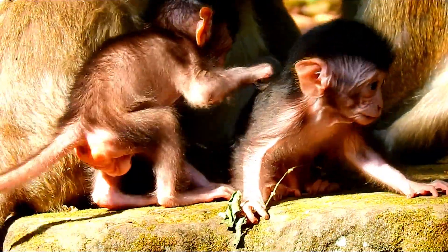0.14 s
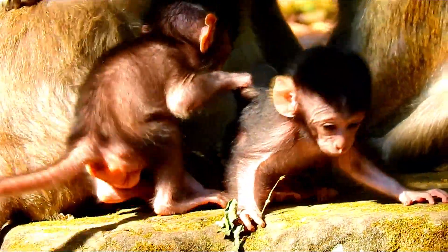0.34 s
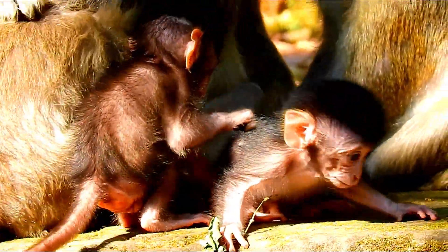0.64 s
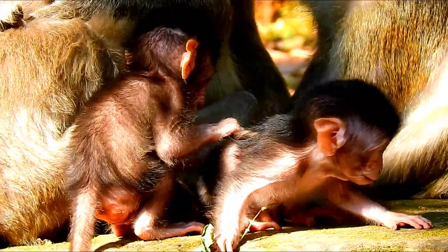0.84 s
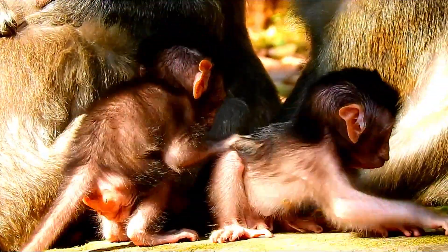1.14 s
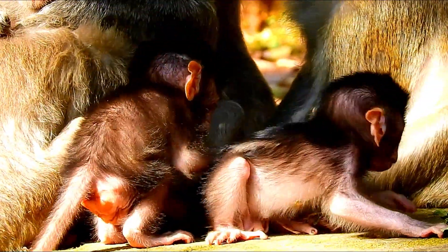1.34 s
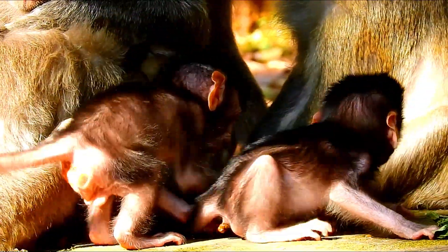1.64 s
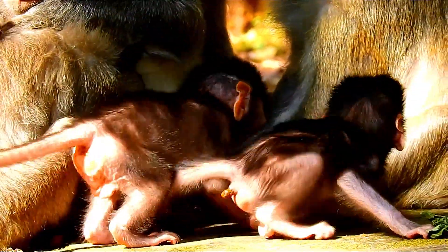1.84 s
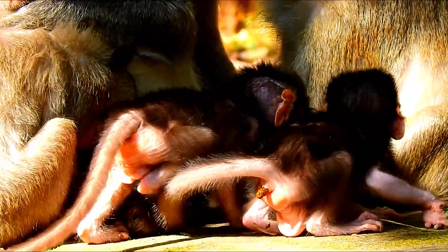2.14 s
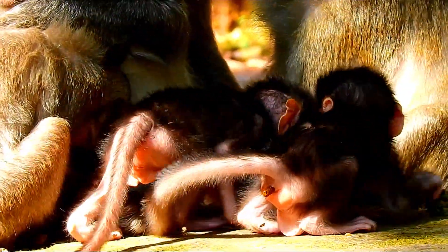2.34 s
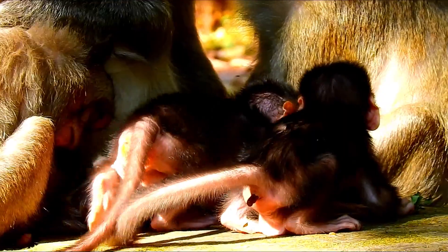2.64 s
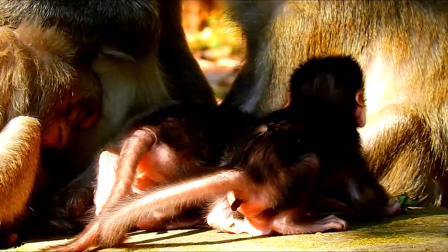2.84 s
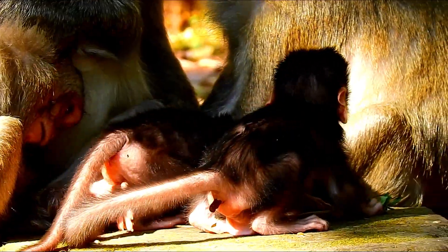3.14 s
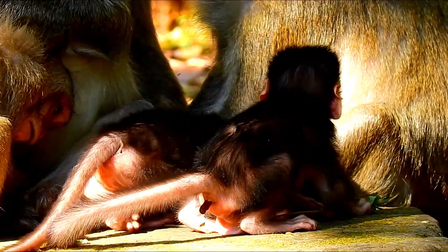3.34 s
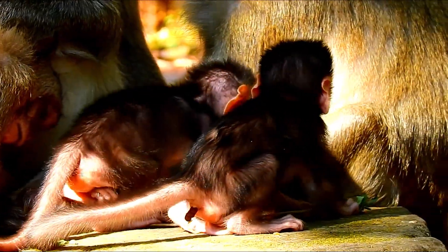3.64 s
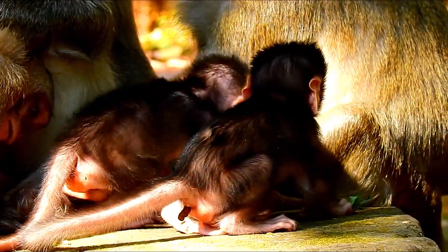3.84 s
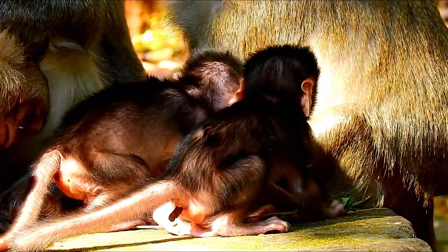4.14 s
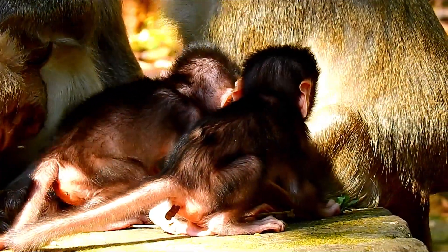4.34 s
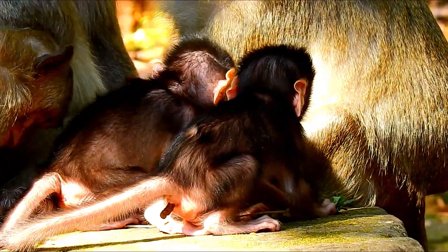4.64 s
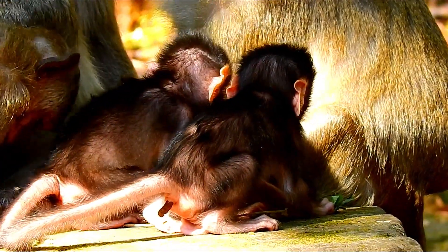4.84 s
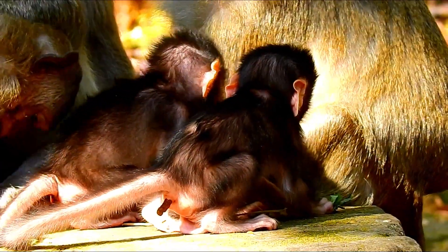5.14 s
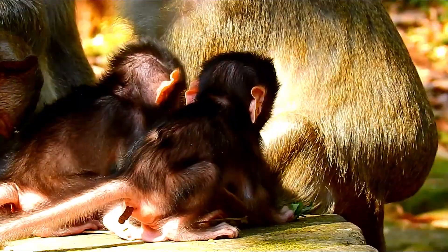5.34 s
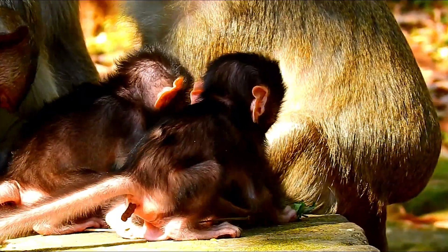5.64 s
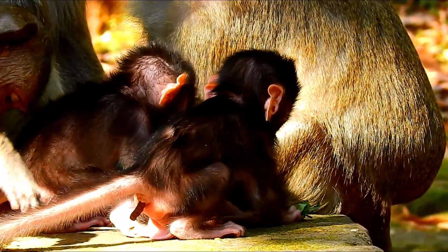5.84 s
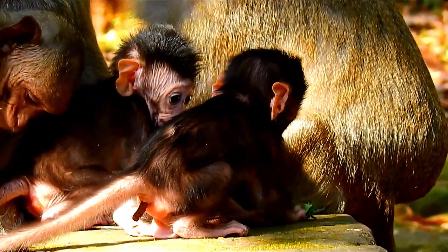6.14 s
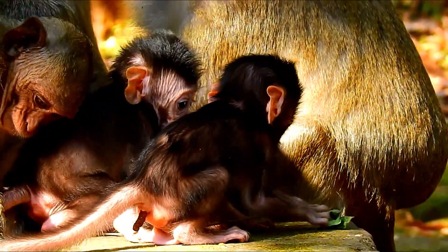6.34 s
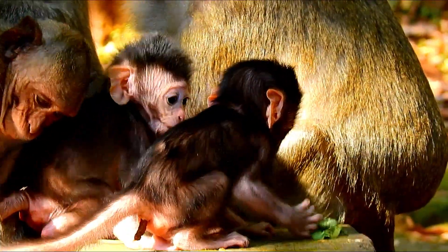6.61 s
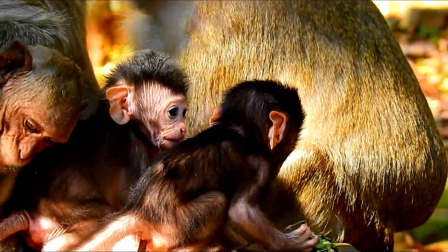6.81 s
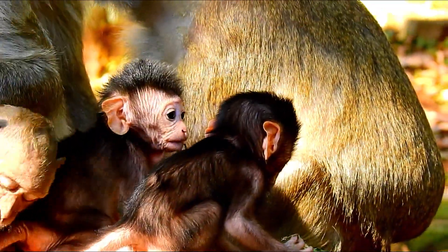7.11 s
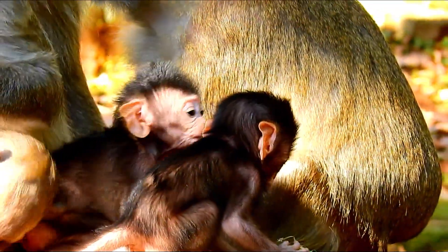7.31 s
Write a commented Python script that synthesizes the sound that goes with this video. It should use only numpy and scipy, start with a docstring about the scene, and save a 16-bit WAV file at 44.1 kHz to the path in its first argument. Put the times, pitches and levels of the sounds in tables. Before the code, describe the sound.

A baby monkey gives hoarse rasps, then a run of shrill, harsh, breaking squeals, followed by softer falling cries and a thin wail outdoors.

```python
"""Stone ledge outdoors, a monkey troop: faint low rumble, uneven rustle and crackling dry leaves behind.
The young ones clamber about with dull bumps and small ticks, made of short decaying noise bursts.
Slightly left and farther off, near-pure glides and swoops; slightly right, a baby monkey cries:
hoarse rasps of shaped noise, shrill period-doubled squeals that break into noise, then a thin wail.
The calls and ticks feed a diffuse echo of about half a second; a stereo microphone pair hears it all."""
import sys
import numpy as np
from scipy import signal
from scipy.fft import rfft, irfft, next_fast_len
from scipy.io import wavfile
from scipy.ndimage import uniform_filter1d, map_coordinates

SR = 44100
rng = np.random.default_rng(int(sys.argv[2]) if len(sys.argv) > 2 else 0)


def int16_out(signal):
    """Quantize to a 16-bit WAV file."""
    q = np.round(np.clip(np.atleast_2d(signal).T, -1, 1) * 32767)
    wavfile.write(sys.argv[1], SR, q.astype(np.int16))


N = 329547  # length in samples


def amp(db):
    """Decibels to gain."""
    return 10 ** (np.asarray(db) / 20)


def unit(x):
    """Scale to rms 1."""
    return x / np.sqrt(np.mean(x ** 2) + 1e-20)


def along(points, hz):
    """(f/Hz, value) points read on a log frequency axis."""
    f, v = np.transpose(points)
    return np.interp(np.log(hz + 1), np.log(f + 1), v)


def span(rows):
    """Sample times from the first row to the last."""
    first, last = round(rows[0][0] * SR), round(rows[-1][0] * SR)
    return np.arange(max(0, first), last) / SR


def curves(rows, t):
    """Each column of a table at the times t."""
    s, *columns = np.transpose(rows)
    return [np.interp(t, s, column) for column in columns]


def wobble(rate, t):
    """A smooth random curve with rate knots a second."""
    knot = (t - t[0]) * rate
    return map_coordinates(rng.standard_normal(int(knot[-1]) + 4), [knot + 1])


def ramped(t, start, end, ramp_s):
    """Rise from 0 to 1 after the start and fall back to 0 by the end."""
    return np.clip(np.minimum(t - start, end - t) / ramp_s, 0, 1)


def filtered(x, response):
    """x times a response of frequency, zero-padded so that ringing does not wrap round."""
    n = x.shape[-1]
    padded = next_fast_len(n + 8192)
    spectrum = rfft(x, padded) * response(np.fft.rfftfreq(padded, 1 / SR))
    return irfft(spectrum, padded)[..., :n]


def noise(spectrum, t):
    """Random noise shaped by a spectrum, at rms 1."""
    white = rng.standard_normal(len(t))
    return unit(filtered(white, lambda hz: amp(along(spectrum, hz))))


def add(track, t, sound, fade=0):
    """Mix a sound in at the times t, with soft ends of fade seconds."""
    if fade:
        sound = sound * ramped(t, t[0], t[-1], fade)
    part = track[round(t[0] * SR):][:len(sound)]
    part += sound[:len(part)]


def cycles(hz):
    """Running phase of a pitch curve, in radians."""
    return 2 * np.pi * np.cumsum(hz) / SR


# Width of diffuse sound at the microphone pair: (f/Hz, side level/dB)
WIDTH = [(60, -40.5), (530, -14.5), (1500, -10), (2800, -8.5), (4700, -4.5), (8000, 2.5)]


def stereo(mid, side):
    """Diffuse sound is near mono in the bass and wide in the treble."""
    side = filtered(side, lambda hz: amp(along(WIDTH, hz)))
    return np.array([mid + side, mid - side])


# Decay of the surroundings by frequency, before any stretch: (f/Hz, t60/s)
ECHO_DECAY = [(150, 0.058), (1000, 0.44), (2200, 0.44), (5500, 0.42), (9000, 0.31), (14000, 0.16)]


def echo(x, stretch=1):
    """A diffuse tail, longest in the middle range, shorter in the treble, shortest in the bass."""
    hz, t, cells = signal.stft(rng.standard_normal((2, SR)), SR, nperseg=256)
    t60 = stretch * along(ECHO_DECAY, hz)[:, None]
    build_up = 1 - np.exp(-t / 0.0093)
    tails = signal.istft(cells * amp(-60 * t / t60) * build_up, SR, nperseg=256)[1]
    tails = tails / np.linalg.norm(tails, axis=1, keepdims=True)
    return stereo(*signal.fftconvolve(x[None], tails, axes=1)[:, :N])


def patchy(x, depth_db):
    """Bands of a noise swell and sink on their own."""
    cells = signal.stft(x, nperseg=2048)[2]
    field = uniform_filter1d(rng.standard_normal(cells.shape), size=4, axis=0)
    field = uniform_filter1d(field, size=7, axis=1)
    return signal.istft(cells * amp(depth_db * unit(field)))[1][:N]


# Spectrum of the outdoor rumble: (f/Hz, relative level/dB)
RUMBLE = [(22, -48.5), (45, -9), (100, 2.5), (150, -7), (220, -15.5), (450, -28), (1000, -57.5)]
# Spectrum of the rustle: (f/Hz, relative level/dB)
RUSTLE = [(250, -11), (450, -13.5), (680, -4), (1200, -5), (2000, -10), (3500, -17), (7000, -18.5),
          (15000, -48.5)]
# Course of the rustle: (t/s, level/dB)
RUSTLE_LEVEL = [(0.0, -70), (0.44, -75.5), (1.06, -72), (1.33, -66.5), (2.1, -62.5), (2.75, -72.5),
                (3.35, -68.5), (3.7, -75.5), (4.6, -79), (5.64, -68.5), (6.6, -77.5), (7.47, -65.5)]
# Spells of clambering, each a heavier rumble: (start t/s, end t/s, rumble level/dB)
CLAMBERING = [(1.072, 2.295, -55), (2.8, 3.24, -62), (6.97, 7.394, -65)]
RUMBLE_DB, CLAMBER_RAMP_S = -71.5, 0.14  # rumble between spells; ramp at each end of a spell


def outdoors():
    """Low rumble, heavier while the young ones clamber, and a soft, uneven rustle."""
    t = np.arange(N) / SR
    moving_db = sum((db - RUMBLE_DB) * ramped(t, start, end, CLAMBER_RAMP_S)
                    for start, end, db in CLAMBERING)
    rustle_db, = curves(RUSTLE_LEVEL, t)
    rumble = amp(1.5 * wobble(12, t)) * noise(RUMBLE, t)
    rustle = patchy(noise(RUSTLE, t), depth_db=3) * amp(2 * wobble(11, t))
    return amp(RUMBLE_DB + moving_db) * rumble + amp(rustle_db) * rustle


TICK_WIDTH_OCTAVES = 0.39


def tick(centre_hz, t60):
    """A short decaying noise burst around one broad resonance, with peak 1."""
    age = np.maximum(np.arange(-SR // 500, SR // 10) / SR, 0)  # a brief silence leads in
    burst = rng.standard_normal(len(age)) * amp(-60 * age / t60) * (age > 0)

    def resonance(hz):
        octaves = np.log2((hz + 1) / centre_hz)
        return (1 + (octaves / TICK_WIDTH_OCTAVES) ** 2) ** -2

    burst = filtered(burst, resonance)
    return burst / np.abs(burst).max()


# Dry leaves stirred: (start t/s, end t/s, level/dB about which the snap peaks spread)
LEAF_STIRS = [(1.1, 1.45, -60), (2.2, 2.6, -55), (6.3, 6.85, -62)]
LEAF_HZ, SNAP_T60_S = 7800, .035  # middle of the snaps' resonances, and their decay
SNAPS_PER_S, SNAP_RANGE_DB = 60, 22


def crackle():
    """Each stir of the leaves swells and fades as a loose scatter of tiny snaps, a few strong and many weak."""
    out = np.zeros(N)
    for start, end, db in LEAF_STIRS:
        count = int((end - start) * SNAPS_PER_S)
        for share, size, pitch in rng.random((count, 3)):
            snap = tick(LEAF_HZ * 2 ** (pitch - .5), SNAP_T60_S)
            snap_db = db - SNAP_RANGE_DB * np.sqrt(size) + SNAP_RANGE_DB / 2
            swell = np.sin(np.pi * share)
            add(out, [start + share * (end - start)], amp(snap_db) * swell * snap)
    return out


# Bumps of the scuffle: (t/s, peak level/dB)
THUDS = [(1.164, -48), (1.383, -41), (1.437, -43), (1.7, -40.5), (1.743, -38.5), (2.043, -45), (2.089, -46)]
# Spectrum of a bump: (f/Hz, relative level/dB)
THUD_BODY = [(60, -24), (105, 10), (175, -1.5), (260, -12), (450, -21.5), (700, -16), (2500, -66.5)]


def scuffle():
    """Soft dull bumps as the young ones clamber about: low noise, quick to rise and decay."""
    out, age = np.zeros(N), np.arange(SR // 4) / SR
    decay = amp(-60 * age / 0.089)  # t60 in seconds
    onset = 1 - np.exp(-age / 0.0055)
    for s, db in THUDS:
        bump = noise(THUD_BODY, age) * decay * onset
        add(out, s + age, amp(db) * bump / np.abs(bump).max())
    return out


# Ticks and smacks: (t/s, peak level/dB before pan and echo, resonance f/Hz, t60/s)
TICKS = [(0.083, -45.5, 1090, 0.052), (0.088, -32.5, 6030, 0.011), (0.398, -53.5, 6850, 0.07),
         (1.161, -17.5, 5900, 0.012), (1.357, -34, 5260, 0.011), (2.329, -39, 7000, .03),
         (2.988, -32.5, 4200, 0.015), (1.535, -43, 5320, .03), (4.526, -47, 1800, 0.025),
         (4.529, -42, 6200, 0.016), (4.941, -52, 2200, 0.09), (5.108, -55.5, 8000, .02),
         (5.612, -36, 1200, 0.022), (6.378, -55, 10980, 0.018), (6.567, -43.5, 8130, .02),
         (6.753, -55, 6640, 0.01), (7.241, -47.5, 923, 0.049), (7.422, -35.5, 5250, 0.014)]


def ticks():
    """Snaps of twigs and smacks of lips, each a short decaying noise burst around one broad resonance."""
    out = np.zeros(N)
    for s, db, centre_hz, t60 in TICKS:
        add(out, [s], amp(db) * tick(centre_hz, t60))
    return out


# Long swooping cries: (roughness, second harmonic level/dB, course of (t/s, pitch f/Hz, relative level/dB))
SWOOPS = [ (0.62, -38, [(5.24, 2400, -76), (5.29, 1894, -56), (5.375, 1490, -48.5), (5.46, 1291, -67)]),
          (0.5, -32, [(6.425, 3550, -76), (6.466, 2460, -67.5), (6.56, 1926, -52), (6.625, 1763, -60.5),
          (6.67, 1452, -63.5)]), (0.26, -53, [(6.96, 4600, -73.5), (7.04, 5560, -52), (7.07, 5480, -71),
          (7.2, 5440, -69), (7.25, 4980, -63), (7.328, 4393, -52.5), (7.355, 3660, -54)]),
          (0.376, -13.5, [(7.01, 2670, -70), (7.045, 3055, -53.5), (7.075, 3400, -51.5),
          (7.105, 2980, -59.5), (7.2, 2900, -62)])]
SWOOP_DB = -1  # trim of all swoops


def swoops():
    """Thin whistling cries that dive, or arch over and fall; random jitter of pitch roughens them."""
    out = np.zeros(N)
    for rough, second_db, course in SWOOPS:
        t = span(course)
        hz, level_db = curves(course, t)
        jitter = .12 * rough * wobble(900, t) + .06 * rough * wobble(120, t)
        phase = cycles(hz * (1 + jitter))
        tone = np.sin(phase) + amp(second_db) * np.sin(2 * phase)
        tone = tone * amp(3.5 * wobble(130, t))
        add(out, t, amp(level_db + SWOOP_DB) * unit(tone), fade=0.0087)
    return out


# Soft gliding cries, and at 3.513 s a high ring lingering after the last squeal:
# (start t/s, length/s, relative level/dB, loudest at share of length,
# first f/Hz, middle f/Hz, last f/Hz, roughness that scales the pitch jitter)
GLIDES = [ (2.198, 0.12, -58, 0.24, 2084, 2130, 2000, 1.09),
          (2.663, 0.54, -57, 0.4, 1197, 1273, 1159, 0.23), (3.513, 0.19, -47, 0.13, 3660, 3730, 3660, 0.22),
          (4.047, 0.38, -66, 0.18, 1172, 1381, 1441, 0.71), (4.681, 0.4, -67, 0.45, 2256, 2300, 1930, 0.86),
          (5.465, 0.23, -54.5, 0.12, 1309, 1301, 1300, 0.35),
          (6.905, 0.066, -67, 0.65, 3600, 3370, 3070, 0.42), (7.194, 0.15, -65, 0.15, 785, 1060, 1080, 1.3)]
GLIDE_SWELL_POWER, GLIDE_DB = 0.79, -2  # how pointed the swell is; trim of all glides


def soft_glides():
    """Soft cries and one lingering high ring: near-pure glides along one bend, swelling once, blurred by jitter."""
    out = np.zeros(N)
    for start, length, db, loudest, first_hz, middle_hz, last_hz, rough in GLIDES:
        t = span([[start], [start + length]])
        share = np.linspace(0, 1, len(t))
        bend = np.polyfit([0, .5, 1], np.log([first_hz, middle_hz, last_hz]), 2)
        pitch = np.exp(np.polyval(bend, share))
        skew = np.log(.5) / np.log(np.clip(loudest, .03, .95))  # moves the peak of the swell
        swell = np.abs(np.sin(np.pi * share ** skew)) ** GLIDE_SWELL_POWER
        phase = cycles(pitch * (1 + 0.15 * rough * wobble(900, t)))
        tone = unit(np.sin(phase) * amp(6.5 * wobble(159, t)))
        add(out, t, amp(db + GLIDE_DB) * swell * tone)
    return out


def stack(pitch, spectrum, t, odd_db, flutter_db, blur=0, count=18):
    """Harmonics through fixed resonances; they trade power at random, and the high ones lose their phase first."""
    phase, orders = cycles(pitch), range(1, count + 1)
    gains = np.array([amp(along(spectrum, k * pitch) + odd_db * (k % 2) + flutter_db * wobble(60, t))
                      for k in orders])
    gains = gains / np.linalg.norm(gains, axis=0)
    return unit(sum(gain * np.sin(k * phase + blur * k * wobble(350, t))
                    for k, gain in zip(orders, gains)))


# Resonance of the mouth in the wail: (f/Hz, relative level/dB)
MOUTH = [(550, -57), (1100, -14), (1300, 22), (1700, -34.5), (3000, -34), (4500, -63)]
# Spectrum of the wail's shrill edge and of the rasps' hiss: (f/Hz, relative level/dB)
HISS = [(3500, -26), (4900, -23), (5650, 3.5), (6600, 5.5), (7400, -4.5), (8500, -24.5), (10500, -33.5),
        (15000, -57.5)]
# One long thin wail: (t/s, second harmonic f/Hz, relative level/dB, relative level of shrill overtones/dB)
WAIL = [(5.679, 1206, -49, -79), (5.697, 1209, -48.5, -65), (5.753, 1216, -57.5, -64),
        (5.781, 1195, -42, -54), (5.829, 1181, -56, -49), (5.977, 1138, -67, -53), (6.13, 1081, -72.5, -58)]
WAIL_DB, WAIL_EDGE_DB, WAIL_AIR_DB = 3, -6.5, -17.5  # trims of tone and edge; breath against tone


def wail():
    """A low cry whose second harmonic sits on the mouth resonance, with a thin shrill edge."""
    out, t = np.zeros(N), span(WAIL)
    second_hz, level_db, edge_db = curves(WAIL, t)
    pitch = second_hz / 2 * (1 + 0.0048 * wobble(60.6, t) + 0.0058 * wobble(600, t))
    edge = stack(pitch, HISS, t, odd_db=0, flutter_db=3, blur=.04) + .5 * noise(HISS, t)
    tone = stack(pitch, MOUTH, t, odd_db=4.0, flutter_db=1) + amp(WAIL_AIR_DB) * noise(MOUTH, t)
    voice = amp(level_db + WAIL_DB) * tone + amp(edge_db + WAIL_EDGE_DB) * edge
    add(out, t, voice, fade=0.0051)
    return out


def scream(pitch, rough, spectrum, t, halfway_db=-4):
    """Alternate cycles differ, putting lines halfway between harmonics; partials flare, strain adds noise."""
    rough = np.clip(rough, 0, 1)
    half = pitch / 2 * (1 + .004 * wobble(80, t) + .045 * rough * wobble(700, t))
    # odd multiples of half the pitch are the halfway lines
    tone = stack(half, spectrum, t, odd_db=halfway_db, flutter_db=6.5, blur=.045 + .22 * rough)
    air = noise(spectrum, t) * (1 + .4 * np.cos(2 * cycles(half)))  # pulses at the pitch
    air = unit(filtered(air, lambda hz: .5 + .5 / (1 + (2800 / (hz + 1)) ** 6)))  # favours the treble
    flare_db = (1 + 2 * np.minimum(rough, .5)) * wobble(220, t)
    return (np.sqrt(1 - rough) * tone + np.sqrt(rough) * air) * amp(flare_db)


# Spectrum of the rasps' body: (f/Hz, relative level/dB)
RASP_BODY = [(600, -53), (1200, -7), (2000, -11.5), (2800, -12.5), (3800, -8), (4500, -2), (5500, -2.5),
             (8000, -53)]
# Hoarse rasps: (start t/s, length/s, relative hiss level/dB, relative body level/dB,
# stretch of pitch and hiss frequencies)
RASPS = [(0, 0.15, -55.5, -57.5, 1.02), (0.123, 0.34, -66, -79, 0.83), (0.448, 0.17, -49, -51.5, 1.02),
         (0.555, 0.34, -61.5, -62, 0.95), (0.915, 0.14, -44, -53.5, 1.084), (1.054, 0.37, -53, -68, 1.08),
         (3.854, 0.15, -67, -101, 1.005), (4.685, 0.19, -54.5, -83, 0.97), (5.16, 0.32, -69.5, -90, 0.93),
         (5.257, 0.48, -57.5, -91, 0.98), (5.475, 0.077, -54, -64, 1.04), (5.77, 0.12, -55, -70, 0.87),
         (7.3, 0.2, -57, -55, 0.7)]
RASP_HZ = 1221  # pitch before the stretch


def rasps():
    """Forced air with barely any pitch rattles through the mouth's resonances; each push swells fast and sags."""
    out = np.zeros(N)
    for start, length, hiss_db, body_db, stretch in RASPS:
        t = span([[start], [start + length]])
        share = np.linspace(0, 1, len(t))
        push = np.abs(np.sin(np.pi * share ** 0.6)) ** 1.39
        pitch = RASP_HZ * stretch * (1 + 0.05 * wobble(20, t))
        hiss_spectrum = [(hz * stretch, db) for hz, db in HISS]
        hiss = scream(pitch, 0.535, hiss_spectrum, t)
        body = scream(pitch, 0.796, RASP_BODY, t)
        add(out, t, push * (amp(hiss_db) * hiss + amp(body_db) * body))
    return out


def resonant(x, centre_hz, width_hz, db):
    """x with one band lifted, at rms 1."""
    return unit(filtered(x, lambda hz: amp(db / (1 + ((hz - centre_hz) / width_hz) ** 2))))


# Resonances of the throat: (f/Hz, relative level/dB)
THROAT = [(700, -35.5), (1100, -14.5), (1500, -11), (2150, -5.5), (2950, 1), (3600, 0), (4500, 2),
          (5400, -3.5), (6700, 4), (7600, -6.5), (8800, -20), (10500, -37.5), (15000, -60.5)]
# Squeals: (relative level/dB, onset resonance f/Hz, open-mouth resonance f/Hz, its lift level/dB,
# halfway lines level/dB with the mouth open, treble cut f/Hz, least roughness 0-1,
# course of (t/s, pitch f/Hz, force level/dB))
SQUEALS = [ (-57, 2600, 3200, 7, -12, 7000, .2, [(.51, 850, -6), (.56, 1110, 1), (.72, 1040, -6)]),
           (-50.5, 3200, 3300, 5, -12, 7000, .15, [(1.143, 1010, 0), (1.19, 1110, 0), (1.33, 1090, -8)]),
           (-39, 4200, 3500, 4, 2, 12000, .12, [(1.556, 1380, -13), (1.592, 1515, -1), (1.648, 1365, -1),
           (1.698, 1425, 3), (1.748, 1300, -6)]), (-34, 1600, 4780, 7, -2, 9000, .1, [(1.925, 1440, -17),
           (1.942, 1525, -8), (1.972, 1470, -4), (1.99, 1570, 0), (2.036, 1620, 3), (2.058, 1450, 0),
           (2.085, 1440, -2), (2.108, 1260, -10)]), (-37, 1750, 4250, 6, 0, 9000, .06, [(2.383, 1260, -17),
           (2.417, 1450, 1), (2.486, 1350, 2), (2.512, 1395, 0), (2.562, 1200, -7)]),
           (-40.5, 2050, 4380, 6, -9, 4800, .22, [(2.85, 1220, -23), (2.885, 1340, -11), (2.915, 1370, -7),
           (2.975, 1505, 1), (3.035, 1420, -6)]), (-34, 3080, 3760, 8, -3, 10000, .27, [(3.297, 1510, -20),
           (3.315, 1550, -12), (3.34, 1540, -10), (3.352, 1790, -1), (3.4, 1910, 2), (3.485, 1840, 0),
           (3.545, 1700, 0), (3.57, 1440, -7)])]
FOCUS_WIDTH_HZ, ONSET_WIDTH_HZ, ONSET_DB = 230, 350, 14  # mouth resonance, open and nearly closed
OPEN_DELAY_S, OPEN_S = 0.036, 0.041  # wait before the mouth opens, and time it takes
STRAIN_ROUGH = 2.2  # roughness gained per share of pitch lost


def squeals():
    """Pitch and force climb, catch and collapse into roughness; as the mouth opens its resonance jumps."""
    out = np.zeros(N)
    for db, onset_hz, focus_hz, focus_db, halfway_db, high_hz, base_rough, course in SQUEALS:
        t = span(course)
        hz, force_db = curves(course, t)
        opening = np.clip((t - t[0] - OPEN_DELAY_S) / OPEN_S, 0, 1)
        pitch_lost = 1 - hz / np.maximum.accumulate(hz)
        rough = base_rough + STRAIN_ROUGH * pitch_lost
        pitch = hz * (1 + .045 * rough * wobble(110, t))
        voice = scream(pitch, rough, THROAT, t, halfway_db * opening)
        voice = filtered(voice, lambda f: 1 / np.hypot(1, (f / high_hz) ** 2))
        closed = resonant(voice, onset_hz, ONSET_WIDTH_HZ, ONSET_DB)
        opened = resonant(voice, focus_hz, FOCUS_WIDTH_HZ, focus_db)
        mouth = opening * opened + (1 - opening) * closed
        add(out, t, amp(db + force_db) * mouth, fade=0.011)
    return out


FAR_ECHO_STRETCH = 1.29  # the echo of the glides and swoops lasts longer


def scene():
    """The loud calls come from slightly right, the soft glides from farther off and slightly left."""
    background = stereo(outdoors(), outdoors())
    leaves = np.array([crackle(), crackle()])
    bumps, taps = scuffle(), ticks()
    glides, thin, harsh = soft_glides() + swoops(), wail(), squeals() + rasps()
    left = amp(2.0) * glides + echo(amp(-1.5) * glides, FAR_ECHO_STRETCH)
    right_send = amp(-6.0) * harsh + amp(-6.5) * thin + amp(-4.0) * taps
    right = amp(-1.0) * harsh + thin + taps + echo(right_send)
    pan = amp([[-.5], [.5]])  # left and right channel gains
    return background + leaves + bumps + left / pan + right * pan


TOP_HZ = 15700


def record(dry):
    """The microphone pair keeps nothing above its band limit."""
    return filtered(dry, lambda hz: hz < TOP_HZ)


dry = scene()
out = record(dry)
int16_out(out)
```